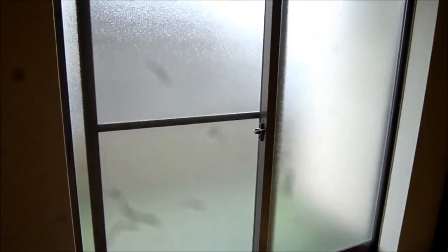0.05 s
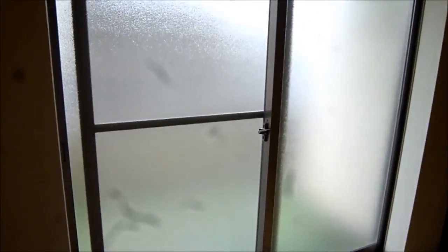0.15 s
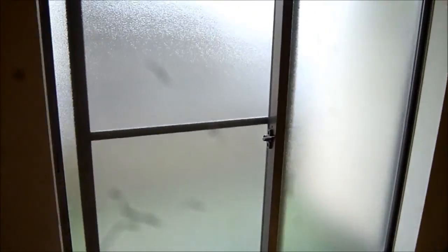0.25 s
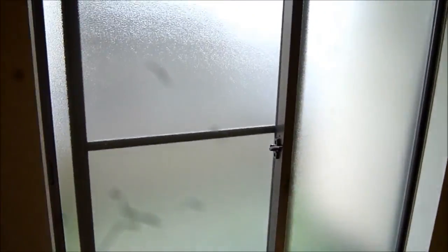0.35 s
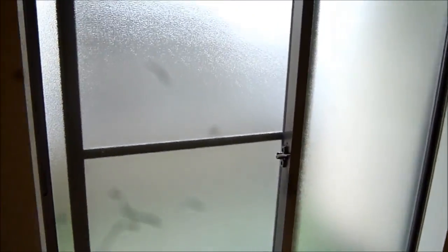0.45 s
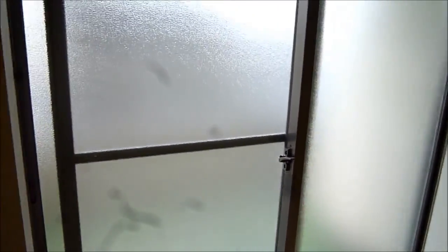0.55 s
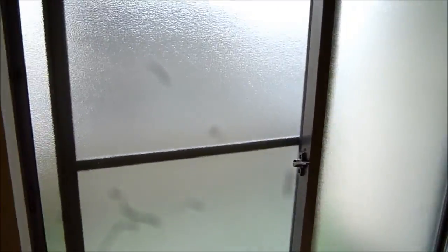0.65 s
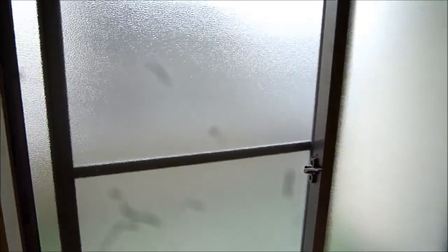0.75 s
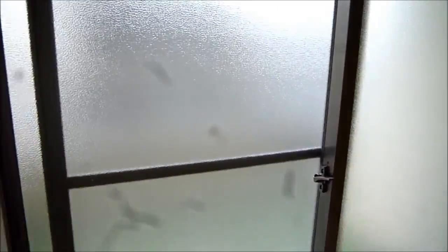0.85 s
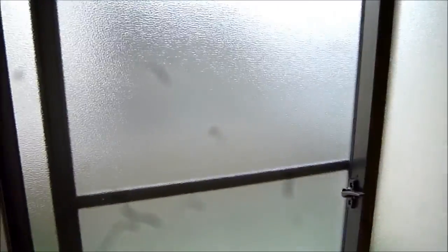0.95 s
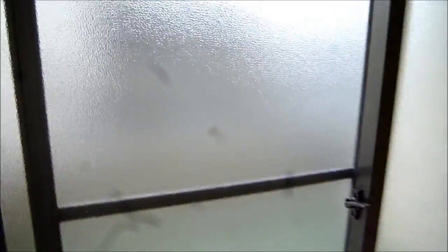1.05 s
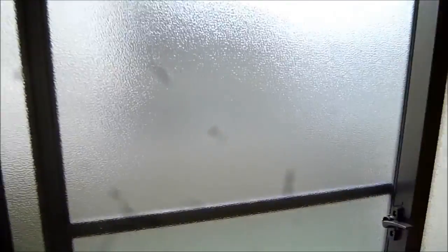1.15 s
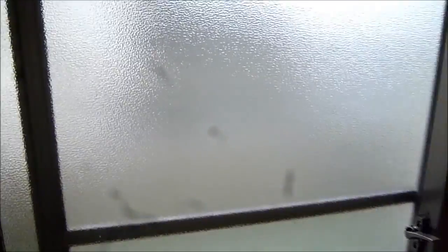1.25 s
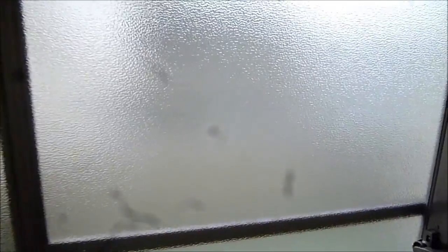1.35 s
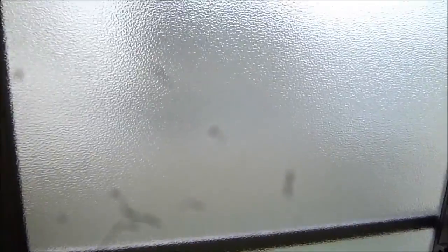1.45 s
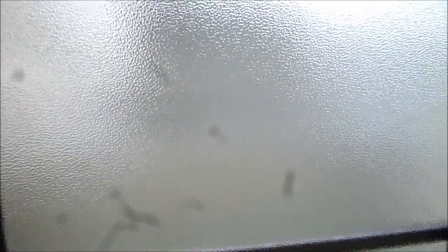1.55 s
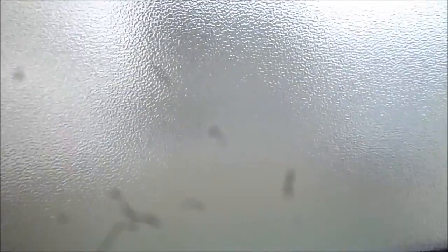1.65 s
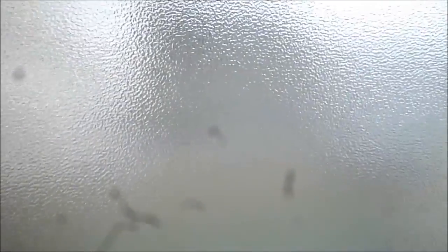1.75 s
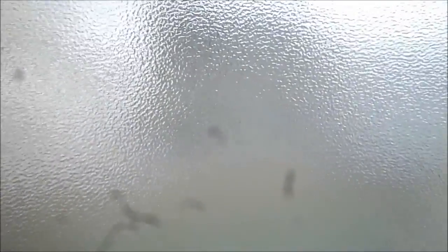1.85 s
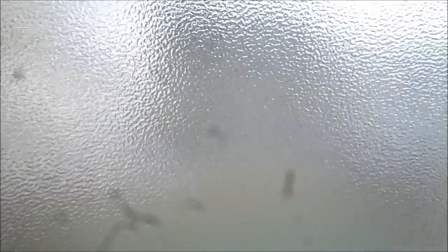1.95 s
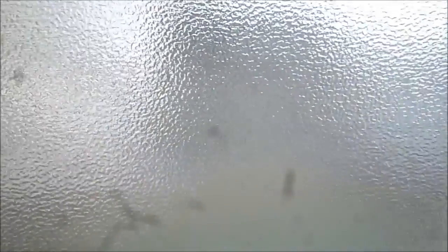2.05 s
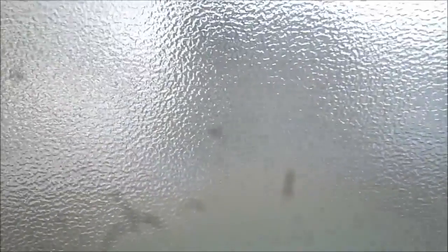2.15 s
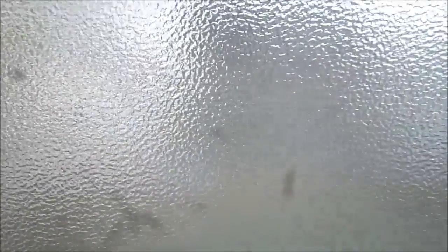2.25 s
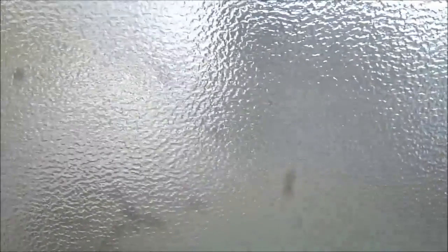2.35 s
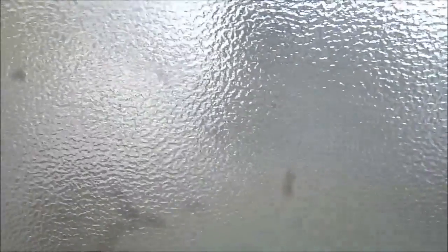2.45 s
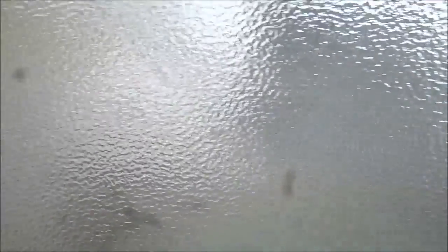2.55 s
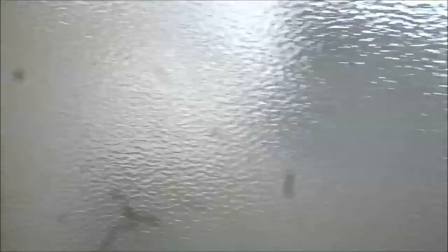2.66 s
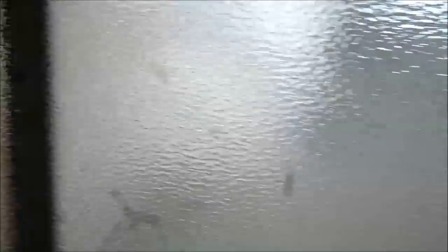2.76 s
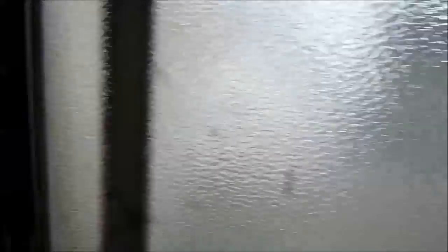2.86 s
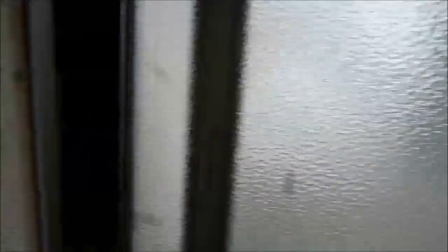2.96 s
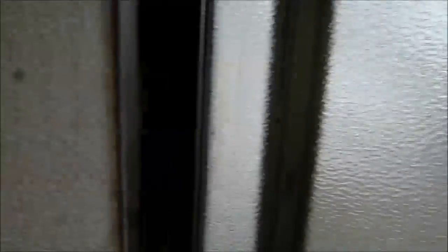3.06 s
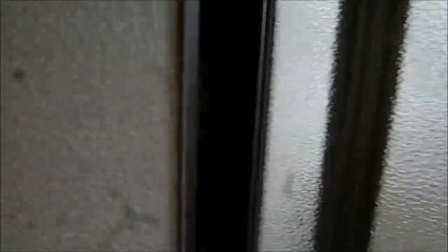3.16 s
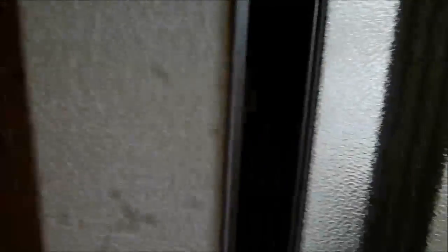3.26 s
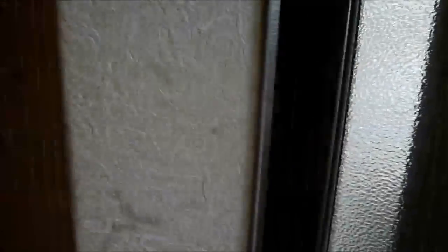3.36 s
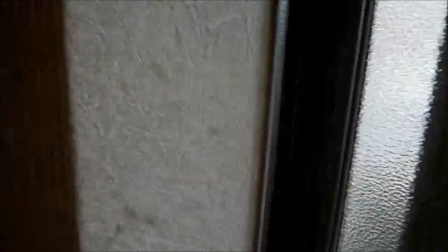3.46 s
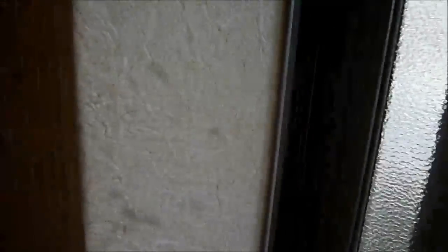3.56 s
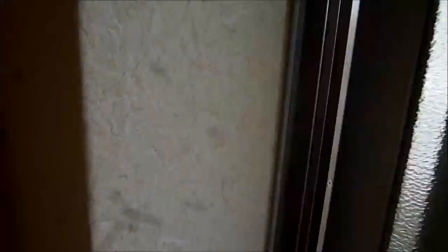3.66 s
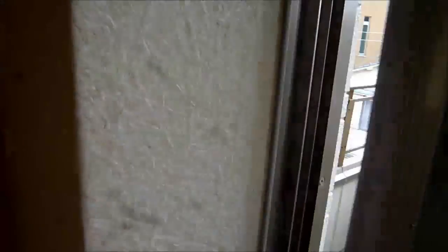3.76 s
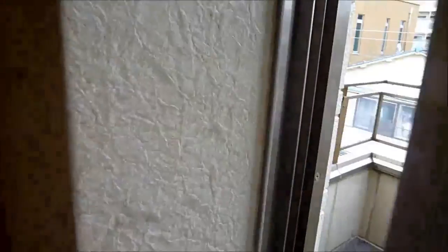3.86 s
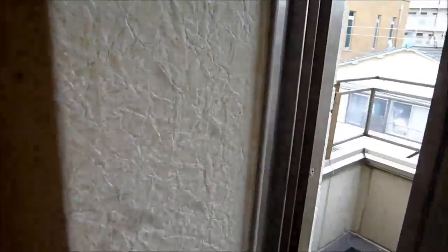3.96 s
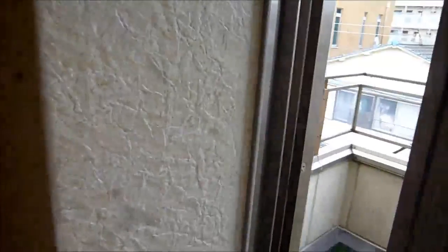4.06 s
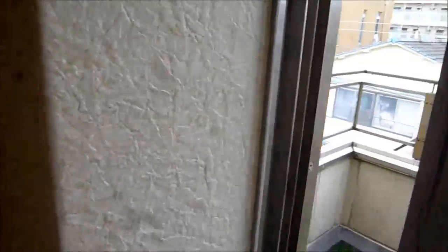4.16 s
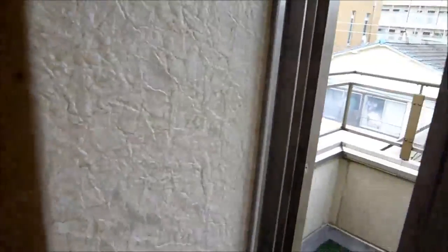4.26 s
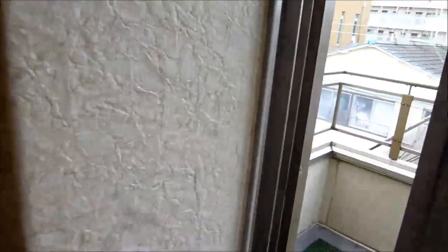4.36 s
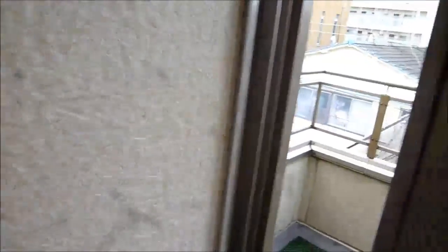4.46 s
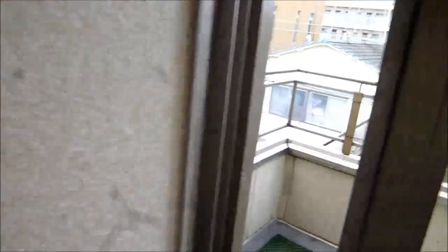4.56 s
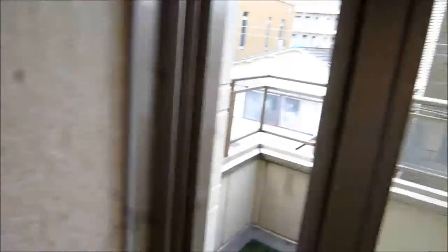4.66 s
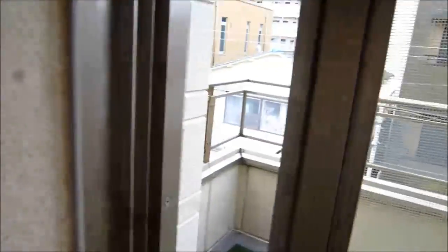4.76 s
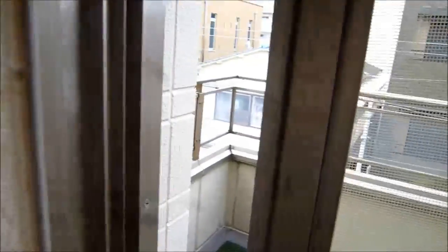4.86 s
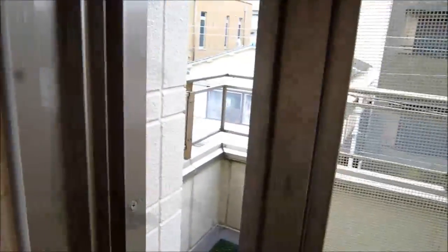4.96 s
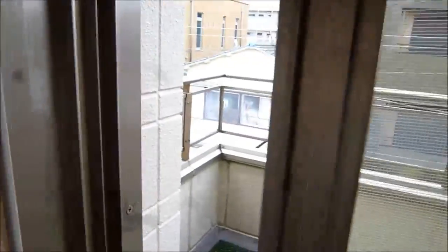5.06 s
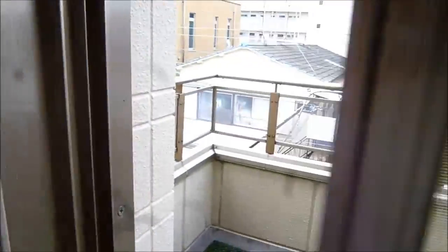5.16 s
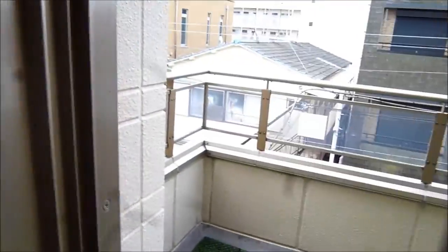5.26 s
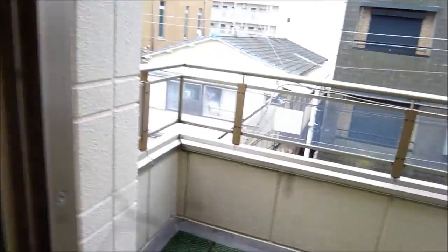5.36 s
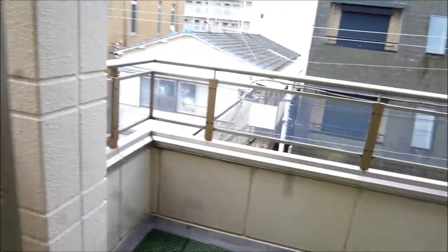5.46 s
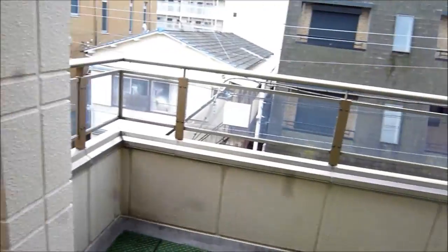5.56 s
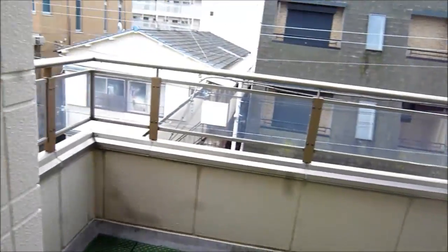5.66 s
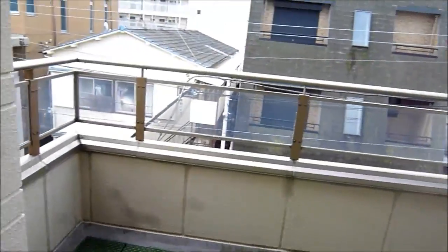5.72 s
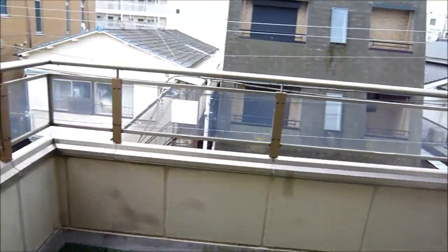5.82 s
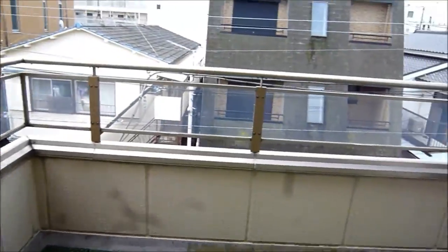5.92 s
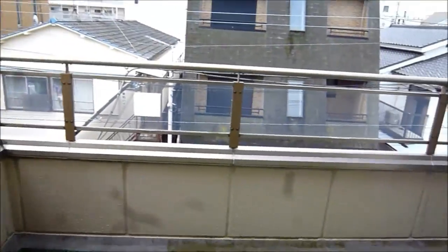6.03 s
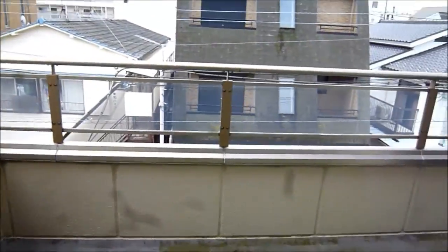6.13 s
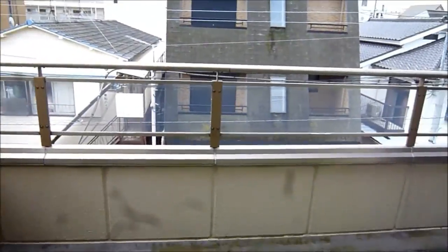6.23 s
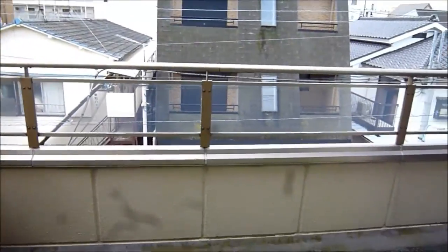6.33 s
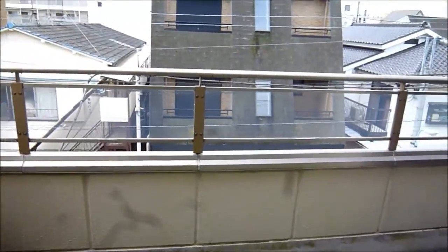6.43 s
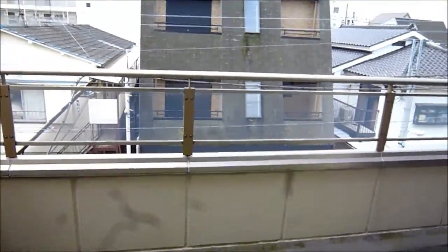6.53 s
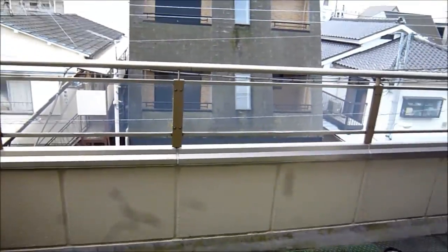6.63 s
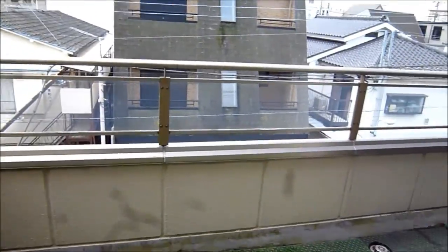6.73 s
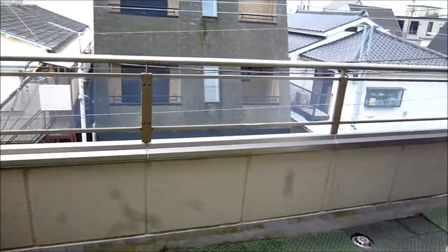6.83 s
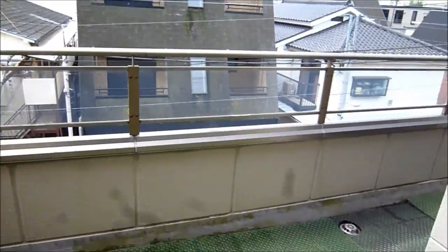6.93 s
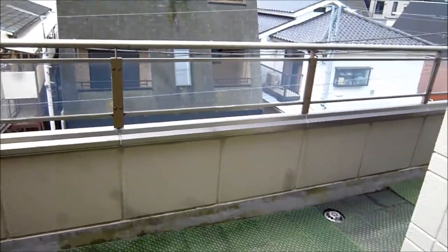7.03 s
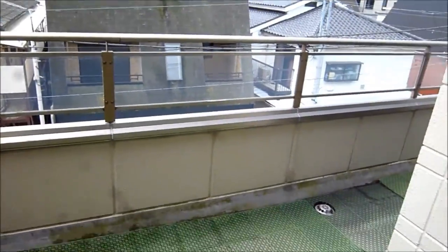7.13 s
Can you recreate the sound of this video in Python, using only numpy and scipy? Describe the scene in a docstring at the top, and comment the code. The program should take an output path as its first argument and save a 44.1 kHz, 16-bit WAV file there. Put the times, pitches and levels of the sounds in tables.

```python
"""Faint rustling and a knock in a hushed, bare room, then a glass sliding door is unlatched and opened.
The latch snaps and its steel lever pings; the door jolts loose, the pane knocking in its metal frame.
The rollers rumble over grit, the seal scrapes and the wheels squeak until the door bumps its stop.
The wash of the town comes in through the gap."""
import sys
import numpy as np
from scipy import signal
from scipy.io import wavfile
from scipy.ndimage import uniform_filter1d

SR = 44100
rng = np.random.default_rng(int(sys.argv[2]) if len(sys.argv) > 2 else 0)


def wav_record(signal):
    """Record a signal, one row per channel, as 16-bit PCM in the file named by sys.argv[1]."""
    frames = np.transpose(np.atleast_2d(signal))
    bounded = np.clip(frames, -1, 1)
    # unit amplitude maps onto the largest positive 16-bit level
    quanta = np.round(bounded * 32767).astype(np.int16)
    wavfile.write(sys.argv[1], SR, quanta)


N = 317032
TIME = np.arange(N) / SR


def amp(db):
    """Decibels to gain."""
    return 10 ** (np.asarray(db) / 20)


def unit_rms(x):
    """Scales to rms 1."""
    return x / np.sqrt(np.mean(x ** 2) + 1e-20)


def log_interp(points, hz):
    """Interpolates a table on a log-frequency axis."""
    table_hz, values = np.transpose(points)
    return np.interp(np.log(hz + 1), np.log(table_hz + 1), values)


def gain_curves(rows):
    """One gain curve per dB column, silent outside the table."""
    times_s, *columns_db = np.transpose(rows)
    return [amp(np.interp(TIME, times_s, db, left=-120, right=-120)) for db in columns_db]


def add(mix, start_s, sound):
    """Mixes a sound in at start_s."""
    part = mix[max(round(start_s * SR), 0):][:len(sound)]
    part += sound[:len(part)]


def colour(x, spectrum, peaks=()):
    """Minimum-phase filter: smooth spectrum plus resonant peaks; output rms 1."""
    hz = abs(np.fft.fftfreq(8192, 1 / SR))
    peaks_db = sum(db / (1 + (2 * (hz - centre) / width) ** 2) for centre, width, db in peaks)
    log_gain = np.log(amp(log_interp(spectrum, hz) + peaks_db))
    response = np.fft.ifft(np.exp(np.conj(signal.hilbert(log_gain)))).real
    return unit_rms(signal.oaconvolve(x, response[:len(hz) // 2])[:len(x)])


def ring(modes, rise_s, samples=SR):
    """Sum of decaying tones with a short rise."""
    t = TIME[:samples]
    tones = sum(amp(db - 60 * t / t60) * np.sin(2 * np.pi * hz * t) for hz, db, t60 in modes)
    return (1 - np.exp(-t / rise_s)) * tones


def grit(per_s, spread_db):
    """Random tiny impacts, a few much larger than the rest."""
    sizes = amp(spread_db * np.minimum(rng.exponential(1, N), 4))
    return unit_rms(sizes * rng.choice([-1, 1], N) * (rng.random(N) < per_s / SR))


def stroke(t, length_s, attack_s, release_s):
    """Rubbing envelope: swells, holds until length_s, dies away."""
    return np.clip(t / attack_s, 0, 1) * np.exp(-np.maximum(t - length_s, 0) / release_s)


def chatter(force, spectrum):
    """Burst of tiny contacts, as strong as the force between the parts."""
    burst = colour(rng.choice([-1., 1.], len(force)) * force, spectrum)
    return burst * np.sqrt(np.mean(force ** 2))


# Room decay: (frequency [Hz], t60 [s])
ROOM_DECAY = [(100, 0.96), (300, 0.65), (1000, 0.51), (3000, 0.69), (5000, 0.47), (8000, 0.6)]

def room(x, tail_db, shiver_db, shiver_t60_s=.081):
    """Direct sound, short shiver of the pane and tail of the bare room."""
    t = TIME[:SR]
    hz, frame_s, noise = signal.stft(rng.standard_normal(SR), SR, nperseg=256)
    decay = amp(-60 * frame_s / log_interp(ROOM_DECAY, hz)[:, None])
    tail = signal.istft(noise * decay, SR, nperseg=256)[1][:SR]
    tail *= np.clip(t / .014, 0, 1)
    shiver = rng.standard_normal(SR) * amp(-60 * t / shiver_t60_s) * (t > .002)
    response = amp(tail_db) * tail / np.linalg.norm(tail)
    response += amp(shiver_db) * shiver / np.linalg.norm(shiver)
    return x + signal.fftconvolve(x, response)[:N]


# Indoor and town spectra: (frequency [Hz], relative density [dB])
HUSH_SPECTRUM = [(25, -38), (70, -33), (130, -18.5), (220, -7.5), (320, 1.5), (430, -1.5), (700, -3),
                 (1100, -6.5), (1700, -15), (3000, -18.5), (5000, -17), (7400, -22.5), (8200, -47.5)]
TOWN_SPECTRUM = [(25, -21.5), (70, -27.5), (130, -16.5), (220, -5), (345, 1.5), (430, -5), (700, -2.5),
                 (1100, -8), (1700, -16), (3000, -20), (4600, -17.5), (7400, -25), (8200, -50)]
# Background: (time [s], hush level [dB], town level [dB])
AIR_LEVELS = [(0, -49, -83), (3, -50.5, -47), (4.001, -43, -45), (6.401, -44.5, -42), (7.19, -54, -43.5)]

def air():
    """Hush of the room; the town grows as the gap widens."""
    hush_gain, town_gain = gain_curves(AIR_LEVELS)
    hush = hush_gain * colour(rng.standard_normal(N), HUSH_SPECTRUM)
    town = town_gain * colour(rng.standard_normal(N), TOWN_SPECTRUM)
    return hush + town


def pane_hum(level_db=-54, mode_hz=88, q=6, fastest_s=5.6, spread_s=.24):
    """The lowest mode of the pane hums while the door runs fast."""
    b, a = signal.iirpeak(mode_hz, q, SR)
    hum = unit_rms(signal.lfilter(b, a, signal.lfilter(b, a, rng.standard_normal(N))))
    return amp(level_db) * np.exp(-((TIME - fastest_s) / spread_s) ** 2) * hum


# Sliding friction: (frequency [Hz], relative density [dB])
SCRAPE_SPECTRUM = [(40, -69), (300, -33), (1400, -9.5), (2600, 2), (4000, 4), (6000, 2), (7500, 4),
                   (8200, -22.5)]

def scrape(per_s, spread_db):
    """Dense tiny impacts hiss between sliding surfaces."""
    return colour(grit(per_s, spread_db), SCRAPE_SPECTRUM)


# Brushed cloth: (frequency [Hz], relative density [dB])
CLOTH_SPECTRUM = [(60, -51.5), (200, -3.5), (500, -2.5), (1100, 0.5), (1800, -7), (3000, -9), (8000, -28.5)]
# Sleeve and hand strokes, and a brief noisy tail after the knock at 1.07 s: (time [s], length [s], cloth level
# [dB], hand level [dB])
RUSTLE_STROKES = [(.21, .1, -40.5, -56), (.39, .11, -46, -53), (.9, .12, -41.5, -56),
                  (1.065, .08, -38.5, -41.5), (1.64, .09, -42, -51.5), (1.86, .06, -44, -45),
                  (2.05, .08, -44, -52), (2.23, .08, -32, -42), (2.37, .24, -38.5, -54),
                  (3.04, .14, -46, -44), (3.37, .04, -38, -43)]

def rustle(cloth_trim_db=-5, hand_trim_db=-3):
    """Clothes brush and a hand slides on the frame."""
    cloth_gain, hand_gain = np.zeros((2, N))
    for start_s, length_s, cloth_db, hand_db in RUSTLE_STROKES:
        envelope = stroke(TIME[:SR], length_s, attack_s=.03, release_s=.05)
        add(cloth_gain, start_s, amp(cloth_db + cloth_trim_db) * envelope)
        add(hand_gain, start_s, amp(hand_db + hand_trim_db) * envelope)
    cloth = cloth_gain * colour(grit(per_s=1500, spread_db=4.5), CLOTH_SPECTRUM)
    hand = hand_gain * scrape(per_s=8000, spread_db=6)
    return room(cloth + hand, tail_db=-10.5, shiver_db=-10)


# Loose-part clack and hard-contact crack: (frequency [Hz], relative density [dB])
CLACK_SPECTRUM = [(40, -55.5), (150, -23.5), (350, -2.5), (700, -8), (1100, -1), (1700, -3.5), (2600, -7),
                  (4000, -14.5), (8000, -44)]
CRACK_SPECTRUM = [(40, -73.5), (200, -49), (500, -26.5), (1500, -7.5), (2500, -0.5), (4000, 6.5),
                  (6000, 10.5), (8000, -11.5)]

def contact(force, clack_db, crack_db):
    """Parts meet with a midrange clack and a bright crack."""
    clack = amp(clack_db) * chatter(force, CLACK_SPECTRUM)
    crack = amp(crack_db) * chatter(force, CRACK_SPECTRUM)
    return clack + crack


# Frame slips: (time [s], level [dB], pitch [Hz])
FRAME_SLIPS = [(2.508, -27, 1630), (2.523, -26, 1460), (2.538, -22, 1048), (2.587, -26, 1010),
               (3.435, -16.5, 1540), (3.474, -26, 1464), (3.624, -19.5, 1003), (3.865, -13, 1020),
               (4.908, -20, 1607), (5.119, -21.5, 1424), (5.324, -13, 867), (5.518, -15, 1780)]

def creaks(rise_s=.0014):
    """The frame slips under load; each slip sings for a few cycles over a little chatter."""
    out, t = np.zeros(N), TIME[:SR // 4]
    force = t / rise_s * np.exp(1 - t / rise_s)
    for start_s, db, hz in FRAME_SLIPS:
        tone = force * np.sin(2 * np.pi * hz * t)
        add(out, start_s, amp(db) * (tone + contact(force, clack_db=-8, crack_db=-20)))
    return room(out, tail_db=-11, shiver_db=-13)


# Wheel slips: (time [s], length [s], level [dB], pitch [Hz])
WHEEL_SLIPS = [(5.56, .045, -31, 7600), (5.688, .025, -19, 7360), (5.716, .036, -13.5, 7255),
               (5.758, .07, -22.5, 7300), (5.85, .05, -21.5, 7290), (5.932, .048, -18, 7410),
               (6.05, .06, -34, 7160), (6.14, .035, -26, 7550), (6.15, .03, -40, 4620),
               (6.203, .042, -21, 4390)]
# Close tones near 4.3 kHz after the last squeak: (frequency [Hz], level [dB], t60 [s])
SQUEAK_RING_MODES = [(4247, -30, .3), (4320, -27, 0.33), (4400, -29, 0.38), (4500, -32, .38),
                     (4495, -30.5, .16)]

def squeaks(sag_per_s=.2, waver=.013, flutter_db=4.5, linger_start_s=6.213):
    """Stick-slip makes a wheel sing at an unsteady, sagging pitch; tones linger after the last squeak."""
    out, lingering = np.zeros((2, N))
    t = TIME[:SR // 4]
    for start_s, length_s, db, hz in WHEEL_SLIPS:
        slow_noise = uniform_filter1d(uniform_filter1d(rng.standard_normal((2, len(t))), 110), 70)
        drift, flutter = map(unit_rms, slow_noise)
        cycles = np.cumsum(hz * (1 - sag_per_s * t + waver * drift)) / SR
        envelope = amp(db + flutter_db * flutter) * stroke(t, length_s, attack_s=.014, release_s=.008)
        add(out, start_s, envelope * np.sin(2 * np.pi * cycles))
    add(lingering, linger_start_s, ring(SQUEAK_RING_MODES, rise_s=.002))
    return lingering + room(out, tail_db=-7, shiver_db=-8)


# Door travel (starts, slows, is pushed hard, runs out): (time [s], level [dB])
TRAVEL_LEVELS = [(3.55, -54), (3.72, -39.5), (3.79, -38.5), (3.85, -30.5), (4.12, -32), (4.54, -33.5),
                 (4.68, -38.5), (5.1, -35.5), (5.24, -24), (5.41, -21.7), (5.58, -26), (5.95, -30),
                 (6.1, -30), (6.22, -38), (6.38, -54)]
# Roller rumble: (frequency [Hz], relative density [dB])
RUMBLE_SPECTRUM = [(25, -51.5), (55, -51), (100, -14.5), (160, -12.5), (250, 1.5), (500, 3.5), (1000, 5.5),
                   (1400, -0.5), (1900, -12.5), (2800, -18.5), (8000, -34)]
# Pane and frame resonances: (frequency [Hz], width [Hz], boost [dB])
DOOR_RESONANCES = [(222, 23, 4.5), (305.4, 29, 8.5), (620, 110, 3), (892, 49, 5), (1750, 200, 7),
                   (2600, 200, 4.5)]
# Seal drags: (time [s], length [s], level [dB])
SEAL_DRAGS = [(3.57, .08, -46), (3.658, .055, -30.5), (3.778, .03, -29), (3.895, .1, -33), (4.06, .07, -35),
              (4.48, .05, -32.5), (4.75, .07, -42), (4.92, .25, -45.5), (5.19, .95, -33), (6.15, .12, -41)]

def rollers(rumble_db=-.7, rattle_db=-11, scrape_db=-16.5, drag_db=-2):
    """Grit under the wheels shakes the door, the loose pane rattles, the seal scrapes the track."""
    travel, = gain_curves(TRAVEL_LEVELS)
    drag = sum(amp(db) * stroke(TIME - start_s, length_s, attack_s=.025, release_s=.028)
               for start_s, length_s, db in SEAL_DRAGS)
    rumble = amp(rumble_db) * colour(grit(per_s=1400, spread_db=2.5), RUMBLE_SPECTRUM, DOOR_RESONANCES)
    rattle = amp(rattle_db) * colour(grit(per_s=70, spread_db=2.5), CLACK_SPECTRUM)
    seal_gain = np.hypot(amp(scrape_db) * travel, amp(drag_db) * drag)
    seal = seal_gain * scrape(per_s=5000, spread_db=4.5)
    return room(travel * (rumble + rattle) + seal, tail_db=-8.5, shiver_db=-6.5)


# Lever strikes: (time [s], level [dB])
LEVER_STRIKES = [(2.553, -18), (2.606, -16.5)]
# Lever modes: (frequency [Hz], level [dB], t60 [s])
LEVER_MODES = [(3666, -16, 0.46), (5880, 1, 0.22), (5882, -19.5, 0.81), (5925, -14, .25), (6180, -6, 0.069)]

def latch():
    """The sprung steel lever pings close by as it flips over and bounces."""
    out = np.zeros(N)
    for start_s, db in LEVER_STRIKES:
        add(out, start_s, amp(db) * ring(LEVER_MODES, rise_s=.00086))
    return room(out, tail_db=-13, shiver_db=-15)


# Final bump, a faint deep thump under a short midrange ring: (frequency [Hz], level [dB], t60 [s])
BUMP_TONES = [(50, -28, 0.054), (208, -26, 0.17), (417, -20, 0.11), (790, 0.5, 0.031), (901, -1, 0.05),
              (1307, -11.5, 0.056), (1647, -15.5, 0.053), (2490, -23, .07)]

def end_stop(touch_s=5.9895, touch_decay_s=.011, bump_s=5.9955, bump_db=1.5,
             shake_db=-20, shake_decay_s=.045):
    """The frame touches the end of the track with a crack, bumps home, and the pane shakes."""
    out, t = np.zeros(N), TIME[:SR]
    add(out, touch_s, contact(np.exp(-t / touch_decay_s), clack_db=-18, crack_db=-18))
    bump = amp(bump_db) * ring(BUMP_TONES, rise_s=.001)
    shake = amp(shake_db) * chatter(np.exp(-t / shake_decay_s), CLACK_SPECTRUM)
    add(out, bump_s, bump + shake)
    return room(out, tail_db=-19, shiver_db=-23)


# Pane boom: (frequency [Hz], relative density [dB])
BOOM_SPECTRUM = [(30, -41.5), (60, -35.5), (110, -15), (250, -7), (500, 5), (900, 1.5), (1800, -13.5),
                 (8000, -54)]
# Frame and metal fitting modes: (frequency [Hz], level [dB], t60 [s])
FRAME_MODES = [(430, -18, .04), (700, -14, .03), (930, -10, .04), (1060, -5.5, .036), (1450, -14, .022)]
FITTING_MODES = [(2460, -7, .022), (2750, -12, .02), (3620, -10, .03), (4150, -13, .04)]

def knock(level_db, treble_db, rise_s, ring_db=0, boom_db=-22, boom_decay_s=.038):
    """One blow: parts clack and crack, frame and fittings ring, the pane booms after."""
    t = TIME[:SR // 4]
    force = t / rise_s * np.exp(1 - t / rise_s)
    impact = contact(force, clack_db=-7, crack_db=treble_db - 8)
    boom_envelope = (1 - np.exp(-t / rise_s)) * np.exp(-t / boom_decay_s)
    boom = amp(boom_db) * chatter(boom_envelope, BOOM_SPECTRUM)
    frame = ring(FRAME_MODES, rise_s, len(t))
    fittings = amp(min(treble_db, 0)) * ring(FITTING_MODES, rise_s, len(t))
    return amp(level_db) * (impact + boom + amp(ring_db) * (frame + fittings))


# Latch, pane and frame knocks: (time [s], level [dB], treble [dB])
DOOR_KNOCKS = [ (1.070, -20, -16), (2.138, -32, 0), (2.237, -22, -8), (2.243, -11.5, -1), (2.266, -22, -2),
               (2.302, -20.5, -15), (2.394, -27, -8), (2.4315, -25.5, 9), (2.476, -26, -14),
               (2.554, -24, 8), (2.604, -26.5, -3), (3.267, -35, 0), (3.57, -22.5, -2), (3.718, -17.5, 9),
               (3.8405, -6, -10.5), (3.862, -16, -15), (3.935, -19, -8.5), (4.040, -13.5, -20),
               (4.083, -12, -3), (4.097, -13, -16), (4.215, -17, -11), (4.299, -19, -4.5), (4.352, -25, -1),
               (4.410, -28.5, -1), (4.478, -17, -7.5), (4.757, -15.5, -3.5), (4.787, -23, -4),
               (4.903, -16, -8), (5.016, -29, 4), (5.118, -19, -11), (5.231, -15, -2), (5.284, -15, -3),
               (5.886, -21, 2)]
# Door breaking free: (time [s], level [dB], treble [dB], rise [s], extra ring [dB])
RELEASE_JOLT = (3.802, -1.5, -6.5, .0011, 4)

def knocks(base_rise_s=.0023, treble_scale_db=35):
    """The latch is worked, the door jolts free, and the pane knocks at each bump of the track."""
    out = np.zeros(N)
    for start_s, db, treble_db in DOOR_KNOCKS:
        rise_s = base_rise_s * np.exp(-treble_db / treble_scale_db)  # brighter is quicker
        add(out, start_s, knock(db, treble_db, rise_s))
    jolt_s, *jolt = RELEASE_JOLT
    add(out, jolt_s, knock(*jolt))
    return room(out, tail_db=-6.5, shiver_db=-9)


def scene():
    """All sources at one microphone, on two identical channels."""
    door = knocks() + creaks() + latch() + end_stop() + rollers() + pane_hum() + squeaks()
    mono = door + rustle() + air()
    return np.array([mono, mono])


def record(dry, low_cut_hz=70, notch_hz=2100, notch_q=2.58, high_cut_hz=8150):
    """A small camera drops deep bass, notches the upper mids, clips at full scale and cuts the top."""
    thin = signal.sosfilt(signal.butter(2, low_cut_hz, "highpass", fs=SR, output="sos"), dry)
    notched = signal.lfilter(*signal.iirnotch(notch_hz, notch_q, SR), thin)
    low_pass = signal.firwin(401, high_cut_hz, window=("kaiser", 9), fs=SR)
    return signal.oaconvolve(np.clip(notched, -1, 1), low_pass[None], "same")


dry = scene()
out = record(dry)
wav_record(out)
```